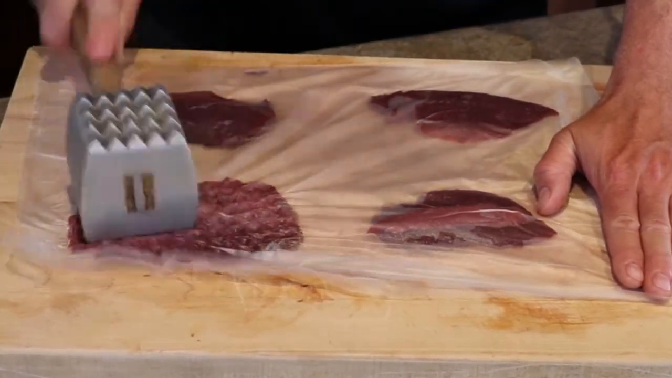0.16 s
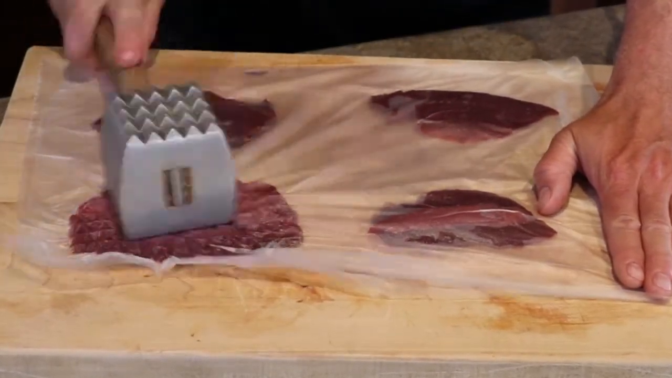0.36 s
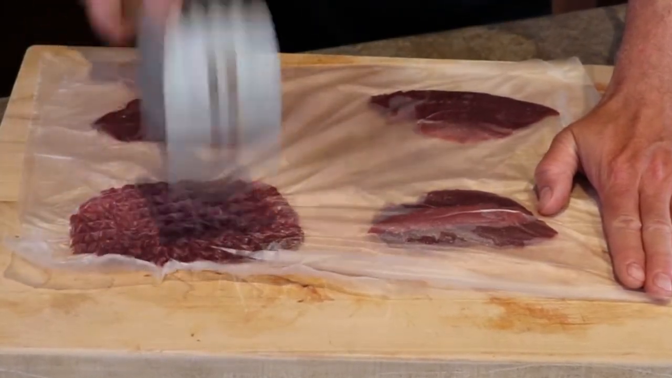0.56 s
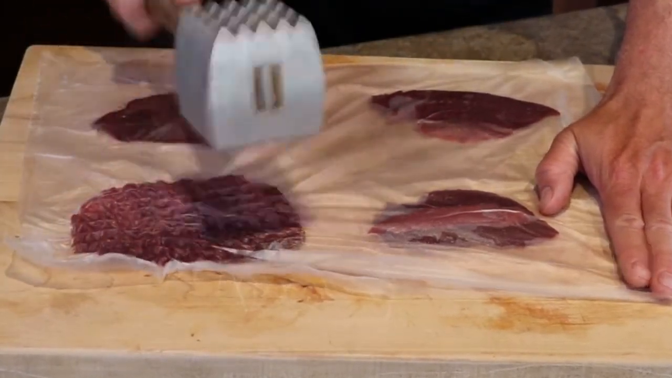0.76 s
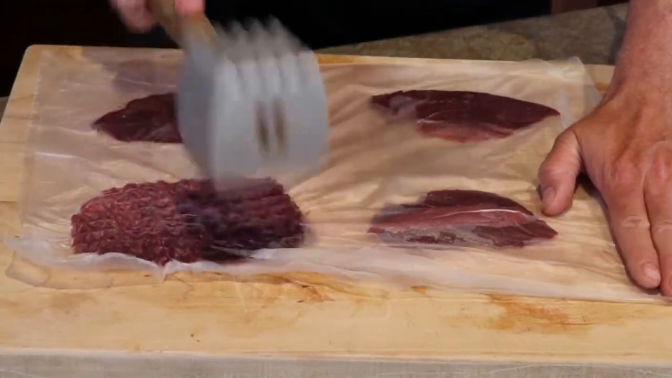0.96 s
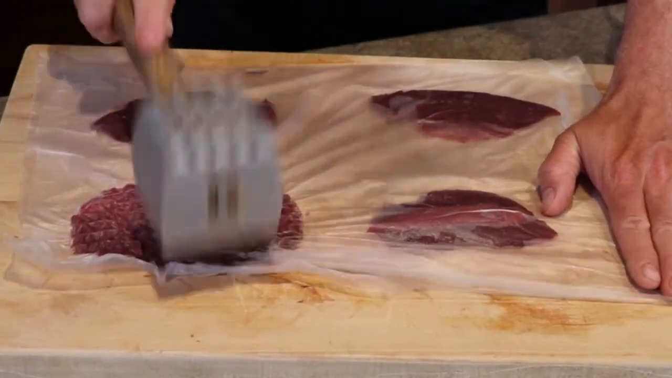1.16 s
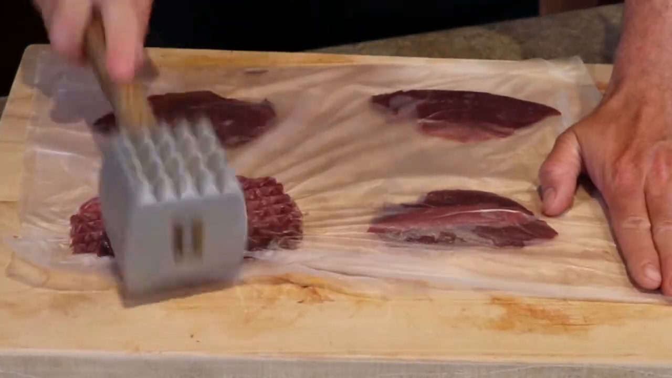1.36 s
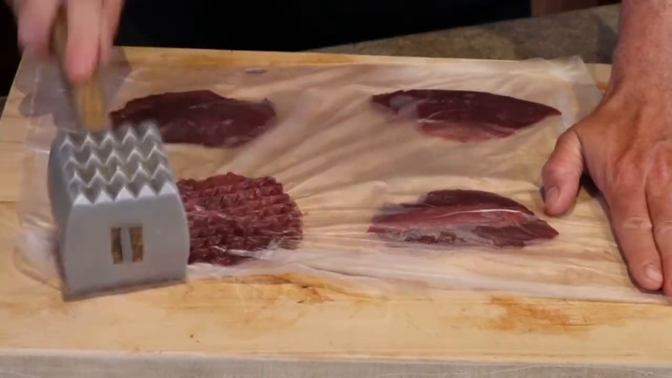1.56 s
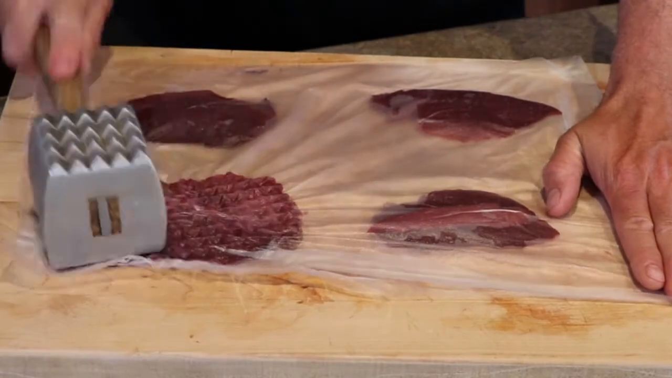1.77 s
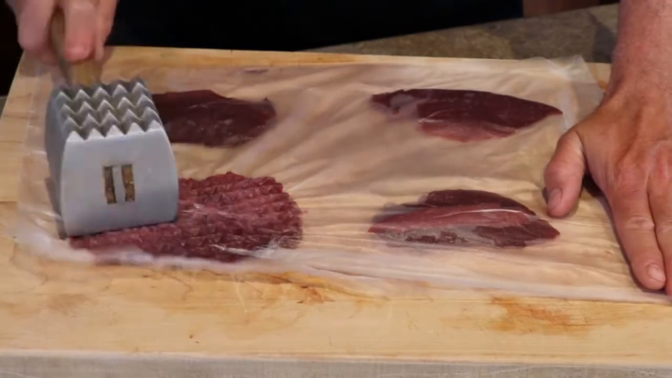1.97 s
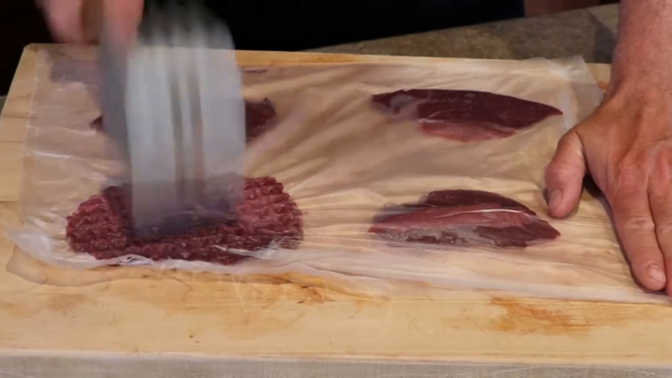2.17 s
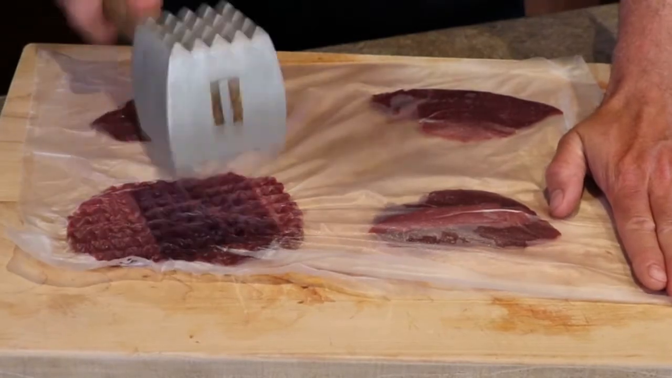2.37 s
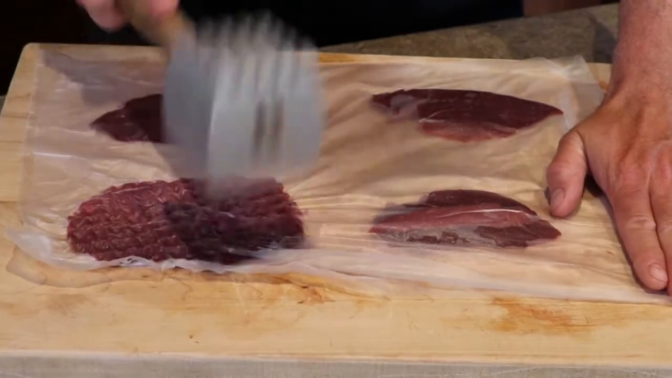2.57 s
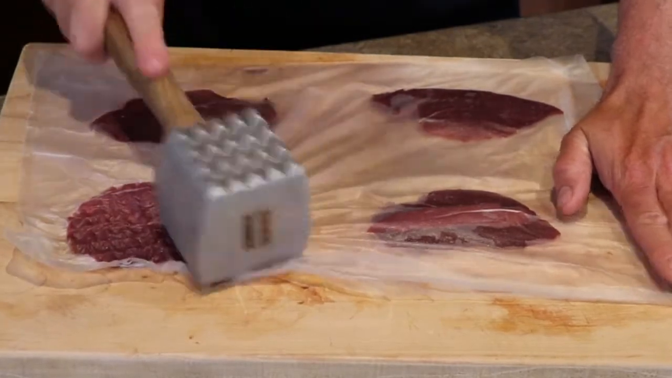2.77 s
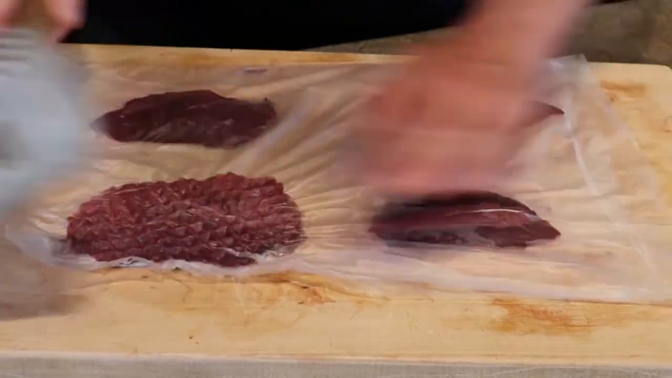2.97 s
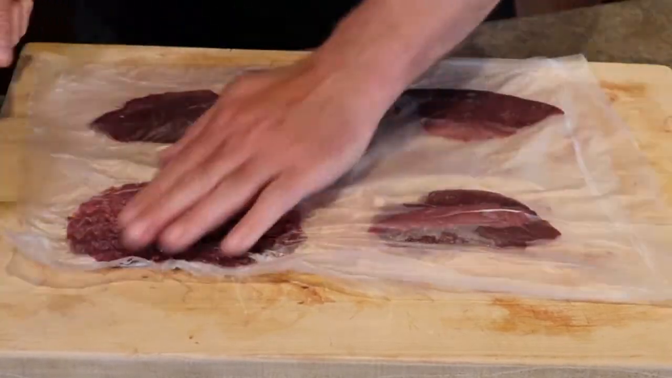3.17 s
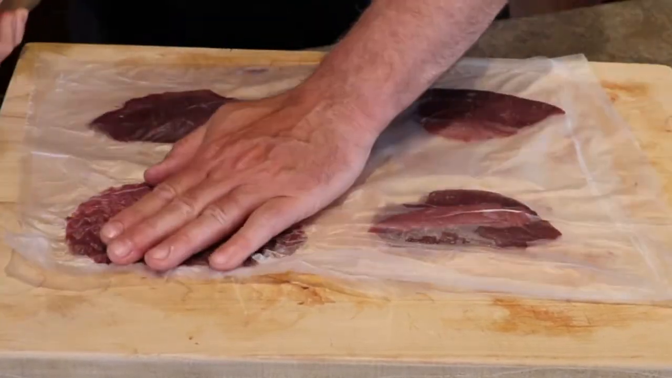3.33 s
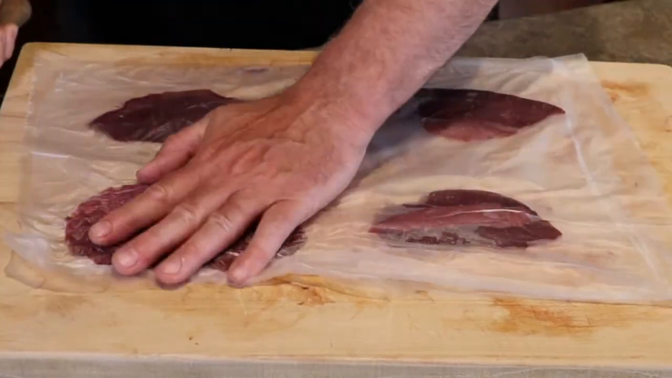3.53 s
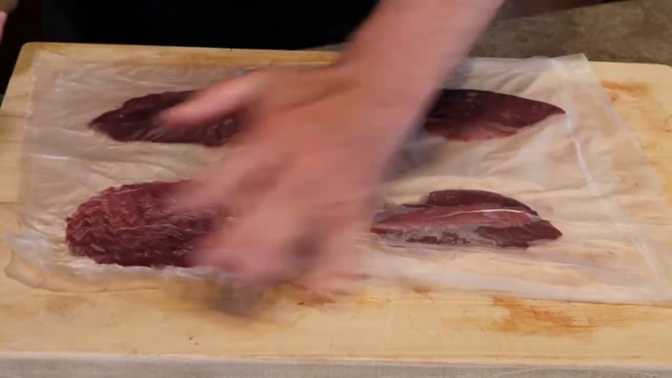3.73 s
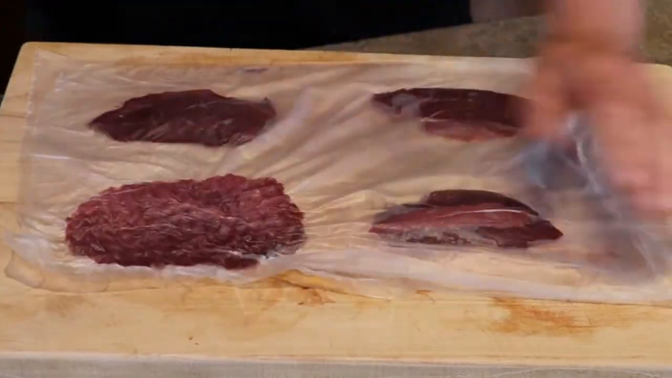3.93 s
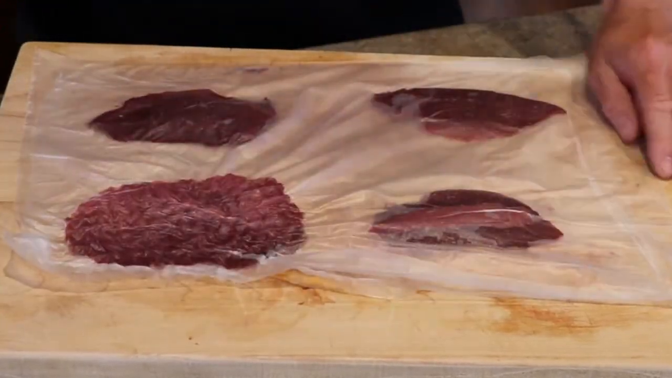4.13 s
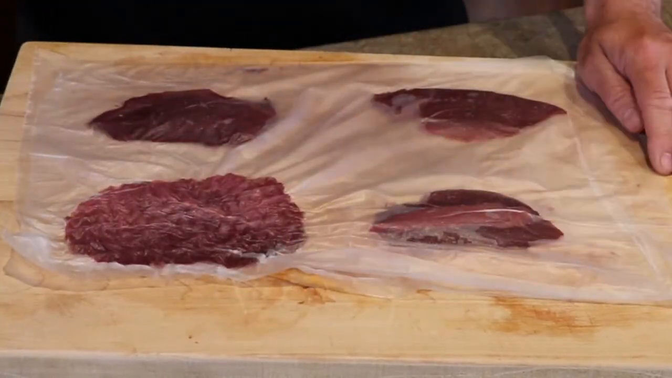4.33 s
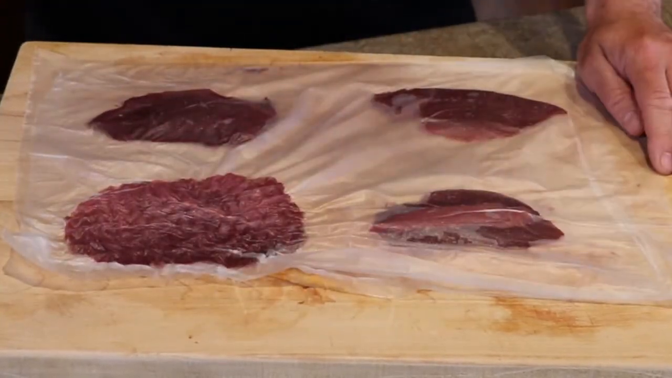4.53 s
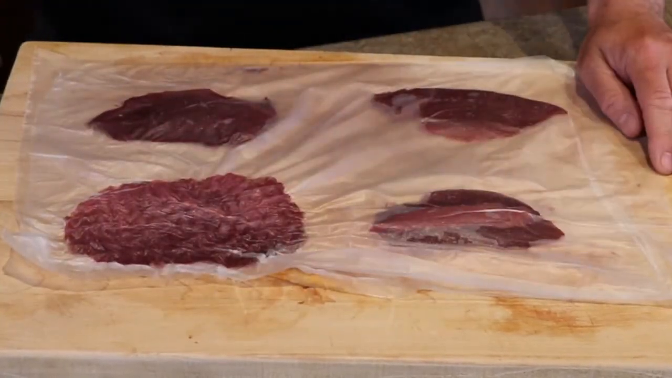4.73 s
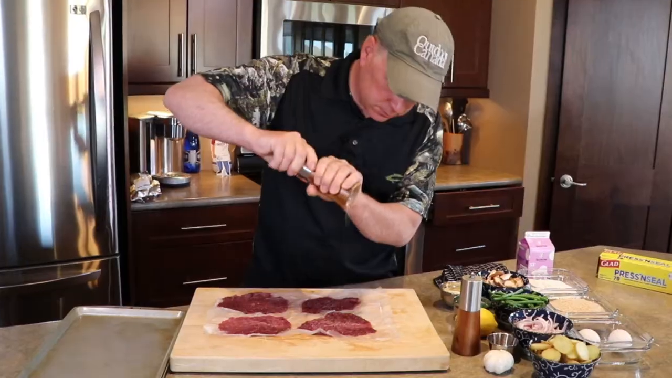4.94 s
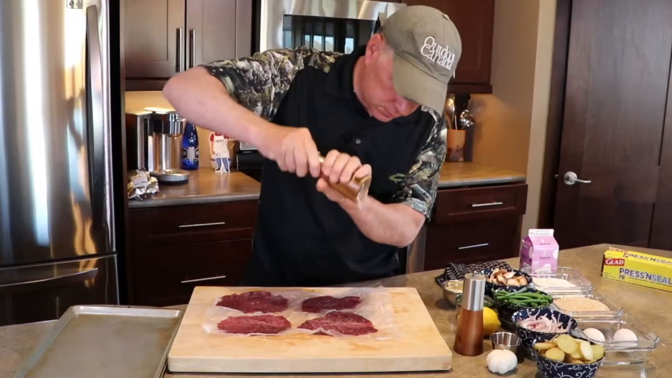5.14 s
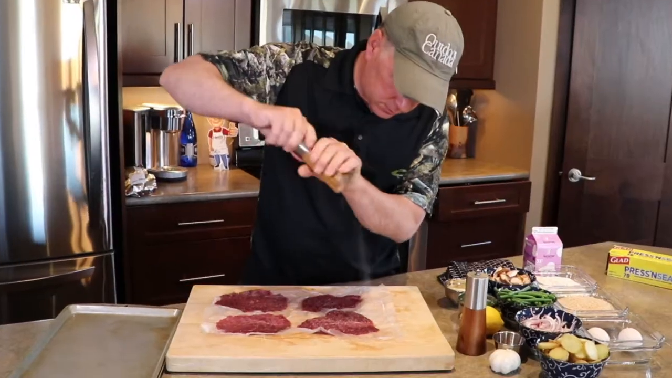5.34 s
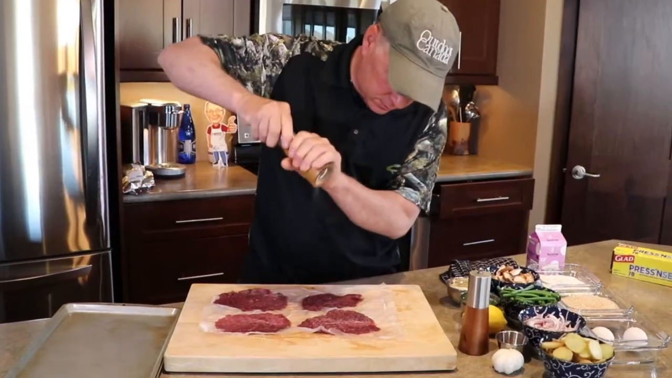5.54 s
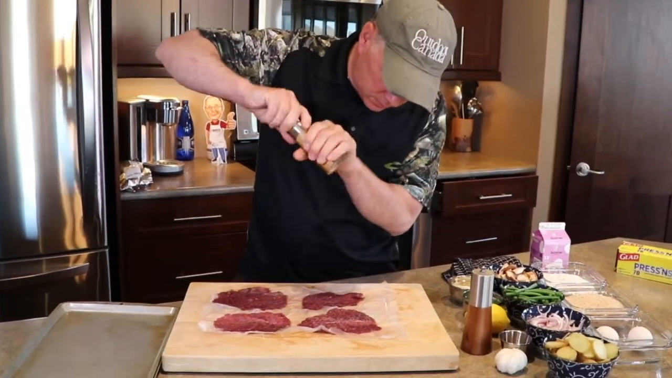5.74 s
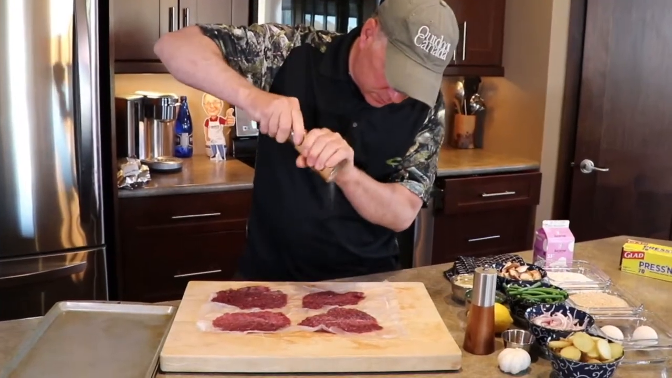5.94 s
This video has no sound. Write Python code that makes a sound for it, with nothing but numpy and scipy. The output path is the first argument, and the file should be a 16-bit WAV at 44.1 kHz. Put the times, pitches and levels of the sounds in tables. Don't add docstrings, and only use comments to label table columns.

```python
import sys
import numpy as np
from scipy import signal
from scipy.fft import rfft, irfft
from scipy.io import wavfile
from scipy.ndimage import uniform_filter1d

SR = 44100
rng = np.random.default_rng(int(sys.argv[2]) if len(sys.argv) > 2 else 0)


def file_out(sig):
    cols = np.atleast_2d(sig).T
    lim = np.clip(cols, -1, 1)
    pcm = np.round(lim * 32767).astype(np.int16)
    wavfile.write(sys.argv[1], SR, pcm)


def voltage_ratio(level):
    return 10 ** (np.asarray(level, float) / 20)


N = 264600

# frequency in Hz, level in dB.
HUSH_COLOUR = [(15, -25), (25, -18), (76, -7.5), (108, -8), (242, -8), (335, -10.5), (476, -8.5),
               (796, -13.5), (936, -16.5), (1790, -16.5), (2220, -21.5), (2840, -25), (6920, -27),
               (16000, -31)]
# time in seconds, gain in dB.
HUSH_RETURN = [(3.2, -2.5), (3.55, -0.5)]
# frequency in Hz, level in dB.
FRIDGE_HUM = [(59.2, -57.5), (247.6, -66.5), (414.5, -60.5), (473.7, -59.5)]
# frequency in Hz, t60 in seconds.
KITCHEN_T60 = [(60, 0.46), (250, 0.46), (600, 0.55), (1500, 0.54), (3000, 0.5), (7000, 0.43), (15000, 0.22)]

# full at in seconds, rise in seconds, hold in seconds, grinding level in dB,
# body level relative to it in dB.
MILL_TWISTS = [(5.008, 0.012, 0.03, -38, -14), (5.046, 0.035, 0.0052, -33, 4.5),
               (5.092, 0.0064, 0.029, -33.5, 9.5), (5.129, 0.029, .001, -27.5, 1),
               (5.17, .01, 0.14, -56, -8), (5.396, .1, 0.054, -36, -17), (5.468, .01, 0.0039, -32.5, -8.5),
               (5.57, 0.11, .002, -42.5, -13), (5.735, 0.11, 0.029, -37.5, -17), (5.8, .02, .01, -44, -25),
               (5.872, 0.018, .003, -24.5, 4), (5.885, .01, 0.029, -35, 3.5),
               (5.93, .02, 0.047, -38.5, -20)]
# frequency in Hz, level in dB.
GRIT_COLOUR = [(1470, -39), (2500, -16.5), (2770, -7), (3380, 5), (3770, 1.5), (5230, 7), (9080, 7.5),
               (10600, 6.5), (13900, 0), (16000, 4.5)]
# frequency in Hz, level in dB, t60 in seconds.
MILL_MODES = [(577, -10.5, 0.0063), (863, -5.5, 0.0075), (1430, -9, 0.0077), (2134, 2.5, 0.0072),
              (2530, -5.5, .012), (3200, 11, 0.0024), (4360, -23, 0.021)]
# start in seconds, level in dB, pitch in Hz, body level relative in dB.
PEPPERCORNS = [(5.009, -24, 7300, 0), (5.021, -34, 9000, 0), (5.0413, -15.5, 7500, -7),
               (5.0462, -18.5, 7900, 6), (5.057, -16, 7800, -10), (5.0913, -21, 6470, -1),
               (5.1012, -10, 7250, 9.5), (5.1099, -24, 7300, 15.5), (5.1304, -13, 7800, -24),
               (5.19, -37, 5050, 3), (5.337, -34, 9700, -15), (5.355, -27, 9780, -2),
               (5.3795, -35, 7100, -30), (5.396, -21.5, 10800, -31), (5.458, -25.5, 7200, 2.5),
               (5.5496, -32, 6080, -16), (5.5762, -26, 11200, -30), (5.733, -26.5, 7300, -37),
               (5.7565, -24.5, 5200, -12), (5.789, -26, 9120, -21), (5.819, -31, 6640, -27),
               (5.852, -23, 7690, 0), (5.8624, -18.5, 9400, 6), (5.8708, -16, 7300, 1),
               (5.8969, -15, 6000, -4), (5.917, -16, 11100, -21.5), (5.93, -19, 9210, -22),
               (5.941, -21, 9800, -23), (5.9718, -20, 7400, -25), (5.9844, -27, 5900, -32)]
# full at in seconds, rise in seconds, hold in seconds, level in dB.
MILL_THUDS = [(5.1, 0.046, 0.012, -34), (5.338, 0.05, .27, -39.5), (5.72, .05, 0.0045, -62),
              (5.788, .04, .005, -64), (5.879, .045, 0.01, -24.5)]
# frequency in Hz, level in dB.
THUD_COLOUR = [(15, 9.5), (40, -2), (90, -1.5), (160, -10.0), (300, -39)]

# full at in seconds, rise in seconds, hold in seconds, crackle level in dB,
# duller rub relative to it in dB.
FILM_STROKES = [
    (3.282, 0.011, .001, -38, -3.5),
    (3.33, 0.036, 0.025, -37, -4),
    (3.41, 0.087, 0.3, -42.5, -7),
    (3.772, 0.11, 0.0053, -35, -4.5),
    (4.18, 0.026, 0.019, -47.5, -0.5),
    (4.268, 0.011, 0.0042, -61, 6),
    (4.854, 0.043, 0.062, -58, -2.5),
]
# frequency in Hz, level in dB.
CRACKLE_COLOUR = [(1470, -39), (2500, -28), (2990, -15), (3770, -9.5), (5650, 1.5), (7020, 3), (8940, -3),
                  (15200, -7.5), (16000, -20)]
# frequency in Hz, level in dB.
RUB_COLOUR = [(800, -4.5), (1300, -2.5), (1550, 3.5), (2100, -2), (3100, -6.0), (4000, -4)]
# start in seconds, level in dB, pitch in Hz.
FILM_SNAPS = [(2.941, -24, 7200), (3.171, -39.5, 6600), (3.1909, -35.5, 6430), (3.2811, -10, 6820),
              (3.3017, -13, 7150), (3.3281, -20, 6400), (3.404, -14, 6900), (3.4548, -32, 6800),
              (3.47, -11, 6500), (3.5084, -14.5, 5780), (3.5267, -26, 6400), (3.545, -14, 6200),
              (3.5912, -14, 7200), (3.6146, -15, 6050), (3.6745, -19, 7200), (3.692, -19, 6230),
              (3.7136, -16, 5900), (3.7696, -23, 6600), (3.83, -23, 5500), (3.9592, -52, 6750),
              (3.996, -30, 6650), (4.1777, -26, 3800), (4.2675, -37, 3940), (4.4182, -38, 7500),
              (4.674, -30, 9500)]
# start in seconds, level in dB, pitch in Hz.
BOARD_TAPS = [(1.174, -18.5, 2960), (2.813, -11, 3200), (4.265, -41, 2080), (4.333, -47, 690)]

# start in seconds, strength in dB,
# thud in dB, knock in dB, bite in dB.
MALLET_BLOWS = [(0.164, -11.5, 5.5, -5, 9.5), (0.402, -10, 3.5, -8, 5.5), (0.641, -4, -4.5, 1, -4.5),
                (0.865, -1, -7.5, -1.7, -10), (1.098, -8.5, -5, 1, -5), (1.322, -12, -0.5, 9.5, 3.6),
                (1.544, -6.5, -5.5, 6.5, -4.3), (1.774, -8.5, -0.5, -2, -7.5), (1.998, -9, 0.5, -7, 0.3),
                (2.236, -12, 2, 6.5, 5.5), (2.46, -10.5, 0, 0.5, -7.5), (2.707, -2, -8, -2, -5.5)]
# strength in dB, thud in dB, knock in dB, bite in dB.
EARLIER_BLOW = (-4.5, -1, -0.5, -3.5)
# frequency in Hz, level in dB, t60 in seconds.
BOARD_MODES = [(69.5, -28, 0.32), (124.7, -15, 0.083), (195, -13.5, 0.059), (242, -11.5, 0.082),
               (325, -5.5, 0.082), (384.5, -2, 0.04), (549.4, -9.5, 0.086), (648.7, -12.5, 0.092),
               (814, -4.5, 0.034), (1034, -10.5, 0.046), (1520.3, -1.5, 0.031), (1687, -6, 0.017),
               (1891, -9.5, 0.028), (2450, -8, 0.0115), (2813, -8, 0.015), (3200, -38.5, 0.0047)]
# frequency in Hz, level in dB.
SLAP_COLOUR = [(100, 11), (400, 13), (1200, 8), (3000, -4), (6000, -11), (10000, -16.5), (16000, -27)]
# Thud, two plain, two knock and two bite pitches, in Hz.
BLOW_BANDS_HZ = [320, 600, 1050, 1500, 1950, 3300, 4500]

# time in seconds, gain in dB.
LEVELLER = [(2, -3.8), (2.72, -2), (3.2, 1.5), (3.5, -1.8)]


def evened(x):
    return x / np.sqrt(np.mean(x ** 2) + 1e-20)


def read(points, hz):
    f, value = np.transpose(points)
    return np.interp(np.log(hz + 1), np.log(f + 1), value)


def colour(x, points):
    gain = voltage_ratio(read(points, np.fft.rfftfreq(len(x), 1 / SR)))
    return irfft(rfft(x) * gain, len(x))


def add(mix, start_s, sound):
    part = mix[round((start_s + 0.5) * SR):][:len(sound)]
    part += sound[:len(part)]


def ring(modes, tilt_db, size):
    hz, db, t60_s = np.transpose(modes)[:, :, None]
    t = np.arange(size) / SR
    detune, phase, strength_db = rng.standard_normal((3, len(modes), 1))
    wave = np.sin(2 * np.pi * hz * (1 + 0.0013 * detune) * t + 0.63 * phase)
    return voltage_ratio(db + tilt_db + strength_db - 60 * t / t60_s) * wave


def tail(size=SR):
    hz, t, bands = signal.stft(rng.standard_normal(size), SR, nperseg=512)
    fade = voltage_ratio(-60 * t / read(KITCHEN_T60, hz)[:, None])
    echoes = signal.istft(bands * fade, SR, nperseg=512)[1]
    echoes *= 1 - np.exp(-np.arange(len(echoes)) / (0.0013 * SR))
    return echoes / np.linalg.norm(echoes)


def grains(per_s, spread_db, clump_db, low_hz, high_hz):
    clumps = evened(uniform_filter1d(rng.standard_normal(N), 200))
    size = voltage_ratio(spread_db * np.minimum(rng.exponential(1, N), 4) + clump_db * clumps)
    size *= rng.choice([-1., 1.], N) * (rng.random(N) < per_s / SR)
    kind = rng.integers(0, 12, N)
    t = np.arange(160) / SR
    out = np.zeros(N)
    for k, hz in enumerate(np.geomspace(low_hz, high_hz, 12)):
        envelope = hz ** 1.5 * hz * t * np.exp(-hz * t / 0.27)
        tick = envelope * np.sin(2 * np.pi * hz * t)
        out += signal.oaconvolve(size * (kind == k), tick)[:N]
    return out


def stroke(full_s, rise_s, hold_s, db, fall_db_per_s):
    t = np.arange(N) / SR
    climb_db = 30 / rise_s * np.maximum(full_s - t, 0)
    fall_db = fall_db_per_s * np.maximum(t - full_s - hold_s, 0)
    return voltage_ratio(db - climb_db - fall_db)


def levels(rows, fall_db_per_s):
    power = np.zeros((2, N))
    for *row, dull_db in rows:
        power += np.outer(voltage_ratio([0, dull_db]), stroke(*row, fall_db_per_s)) ** 2
    return np.sqrt(power)


def click(hz, t60_s, size=900):
    t = np.arange(size) / SR
    burst = rng.standard_normal(size) * voltage_ratio(-60 * t / t60_s)
    band_hz = [0.833 * hz, min(1.206 * hz, 20000)]
    burst = signal.sosfilt(signal.butter(2, band_hz, "band", fs=SR, output="sos"), burst)
    return burst / abs(burst).max()


def hush():
    t = np.arange(N) / SR
    hum = np.zeros(N)
    for hz, db in FRIDGE_HUM:
        waver = 1 + 0.12 * evened(uniform_filter1d(rng.standard_normal(N), 5000))
        hum += voltage_ratio(db) * waver * np.sin(2 * np.pi * hz * t)
    level_db = -50 + np.interp(t, *np.transpose(HUSH_RETURN))
    return voltage_ratio(level_db) * evened(colour(rng.standard_normal(N), HUSH_COLOUR)) + hum


def mill():
    bright, dull = levels(MILL_TWISTS, fall_db_per_s=474)
    grit = evened(colour(grains(4500, 4.8, 2.2, low_hz=3800, high_hz=14100), GRIT_COLOUR))
    clumps = evened(uniform_filter1d(rng.standard_normal(N), 120))
    shocks = rng.standard_normal(N) * voltage_ratio(5.1 * clumps)
    swell = 1 - np.exp(-(np.arange(1500) / 48.0) ** 2)
    body_ring = swell * ring(MILL_MODES, 0, size=1500).sum(0)
    body = evened(signal.fftconvolve(shocks, body_ring)[:N])
    cracks = np.zeros(N + SR // 2)
    for s, db, hz, body_db in PEPPERCORNS:
        crack = click(hz, t60_s=0.016) + 0.62 * click(0.5 * hz, t60_s=0.0069)
        add(cracks, s, voltage_ratio(db - 5.5) * crack)
        add(cracks, s, voltage_ratio(db + body_db - 1.5) * swell * ring(MILL_MODES, 0, size=1500).sum(0))
    low = evened(colour(rng.standard_normal(N), THUD_COLOUR))
    thuds = low * sum(stroke(*row, fall_db_per_s=600) for row in MILL_THUDS)
    return voltage_ratio(-5.0) * (bright * grit + dull * body) + cracks[SR // 2:] + thuds


def film():
    bright, dull = levels(FILM_STROKES, fall_db_per_s=318)
    crackle = evened(colour(grains(5000, 3.8, 2.9, low_hz=2640, high_hz=14100), CRACKLE_COLOUR))
    rub = evened(colour(grains(2500, 2.25, 3.1, low_hz=1130, high_hz=3470), RUB_COLOUR))
    clicks = np.zeros(N + SR // 2)
    for s, db, hz in FILM_SNAPS:
        add(clicks, s, voltage_ratio(db - 6.5) * click(hz, t60_s=0.003))
    for s, db, hz in BOARD_TAPS:
        add(clicks, s, voltage_ratio(db + 4.0) * click(hz, t60_s=0.01))
    return voltage_ratio(3.0) * (bright * crackle + dull * rub) + clicks[SR // 2:]


def blow_echoes(modes, favour, room):
    bins_hz = np.fft.rfftfreq(len(room), 1 / SR)
    mode_power = (abs(rfft(modes)) ** 2).sum(0)
    power = np.interp(bins_hz, np.fft.rfftfreq(modes.shape[1], 1 / SR), mode_power)
    power += voltage_ratio(17.0 + read(SLAP_COLOUR, bins_hz) + read(favour, bins_hz)) ** 2
    varied = np.roll(1.21 * room + 0.93 * tail(), 500)
    echoes = irfft(rfft(varied) * np.sqrt(power), len(room))[:SR * 3 // 4]
    return echoes * signal.windows.tukey(len(echoes), 0.03)


def mallet():
    out = np.zeros(N + SR // 2)
    size = 12000
    t = np.arange(size) / SR
    room = tail()
    rise = np.clip(t / 0.005, 0, 1) ** 3
    for s, db, thud_db, knock_db, bite_db in [(-0.07, *EARLIER_BLOW), *MALLET_BLOWS]:
        gains_db = [thud_db, 0, 0, knock_db, 0.34 * knock_db, bite_db, 0.56 * bite_db]
        favour = list(zip(BLOW_BANDS_HZ, gains_db))
        tilt_db = read(favour, np.array(BOARD_MODES)[:, :1])
        modes = rise * ring(BOARD_MODES, tilt_db, size)
        noise = evened(colour(rng.standard_normal(size), SLAP_COLOUR))
        slap = rise * colour(noise, favour) * voltage_ratio(-2.0 - 60 * t / 0.03)
        rebound = ring(BOARD_MODES[:9], 3.5, size).sum(0) * (1 - np.exp(-t / 0.013))
        add(out, s, voltage_ratio(db + 21.5) * (modes.sum(0) + slap))
        add(out, s + 0.086, rebound)
        add(out, s, voltage_ratio(db + 10.5) * blow_echoes(modes, favour, room))
    return out[SR // 2:]


def scene():
    near = film() + mill()
    wet = voltage_ratio(-13.5) * signal.fftconvolve(near, tail())[:N]
    return (mallet() + near + wet + hush())[None]


def band_limit(x):
    return signal.sosfilt(signal.butter(12, 16990, fs=SR, output="sos"), x)


def record(dry):
    t = np.arange(N) / SR
    power_db = 10 * np.log10(signal.lfilter([0.004], [1, 0.004 - 1], dry[0] ** 2 + 1e-12))
    power_db[0] = -5.0
    recovery_db = 180 * t
    held_db = np.maximum.accumulate(power_db + recovery_db) - recovery_db
    held_db = np.maximum(held_db + 17.0, 0)
    lag = 1 / (0.0085 * SR)
    over_db = signal.lfilter([lag], [1, lag - 1], held_db, zi=held_db[:1])[0]
    bass_cut = signal.sosfilt(signal.butter(2, 50., "high", fs=SR, output="sos"), dry)
    ducked = bass_cut * voltage_ratio(-0.92 * over_db)
    clipped = ducked / (1 + abs(ducked) ** 6) ** (1 / 6)
    out = clipped * voltage_ratio(np.interp(t, *np.transpose(LEVELLER)))
    out = signal.sosfilt(signal.butter(1, 40., "high", fs=SR, output="sos"), out)
    treble_edge = signal.firwin(511, 15800, window=("kaiser", 3), fs=SR)
    out = signal.oaconvolve(out, treble_edge[None], "same")
    return band_limit(out)


dry = scene()
out = record(dry)
file_out(out)
```